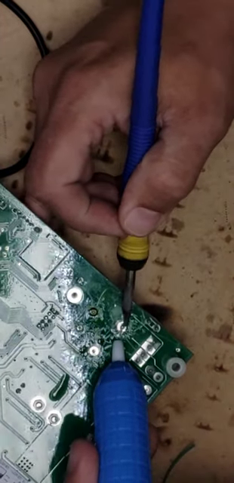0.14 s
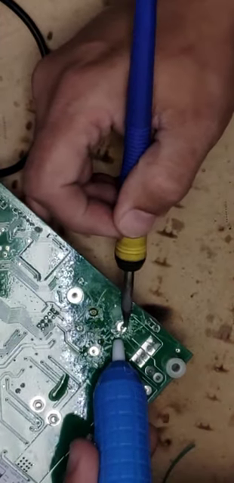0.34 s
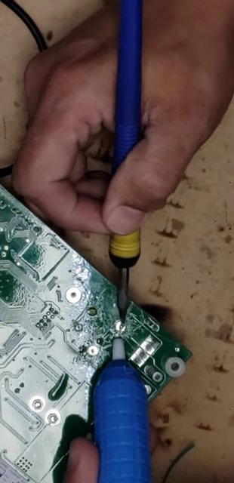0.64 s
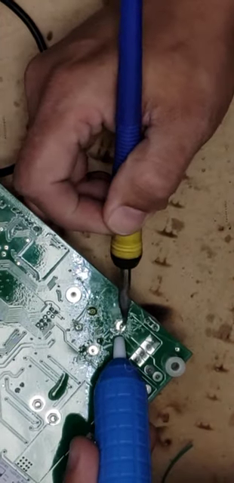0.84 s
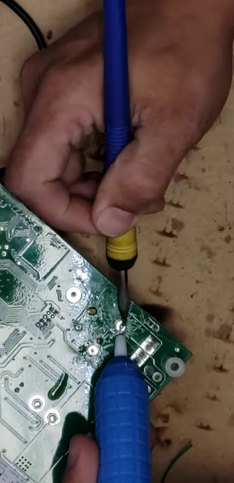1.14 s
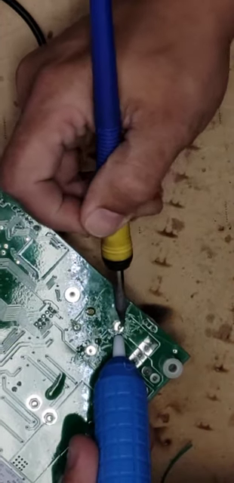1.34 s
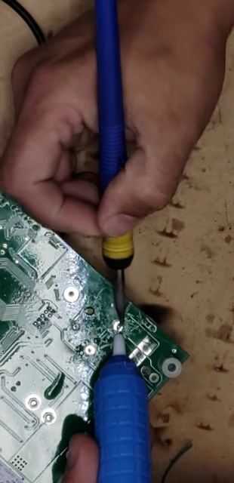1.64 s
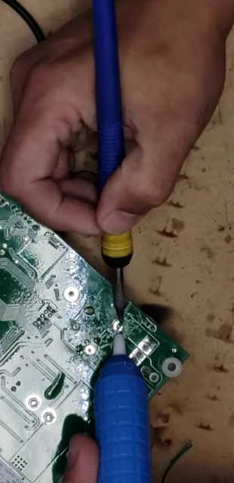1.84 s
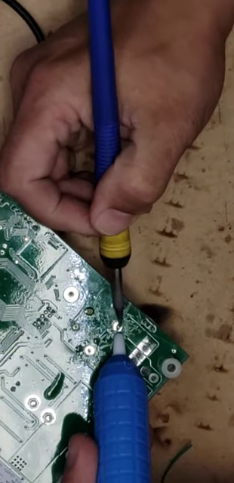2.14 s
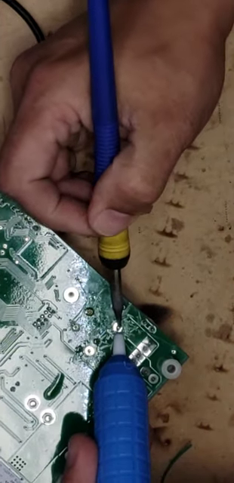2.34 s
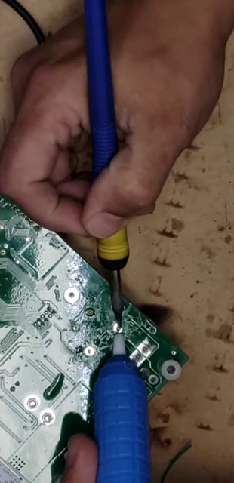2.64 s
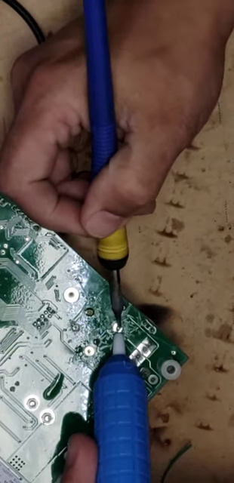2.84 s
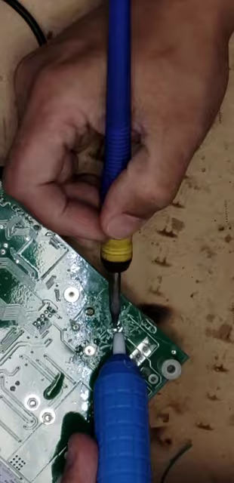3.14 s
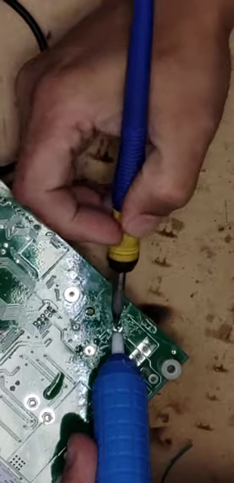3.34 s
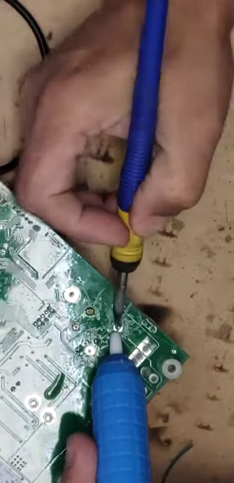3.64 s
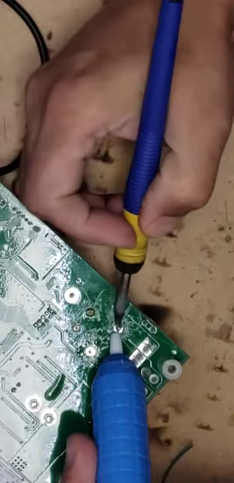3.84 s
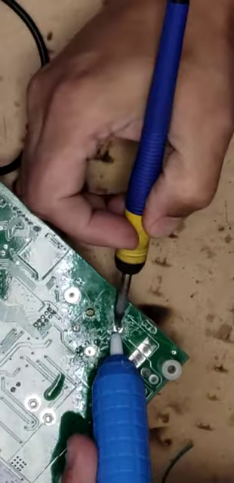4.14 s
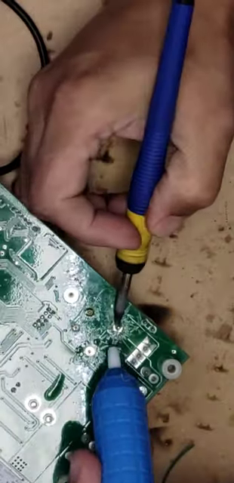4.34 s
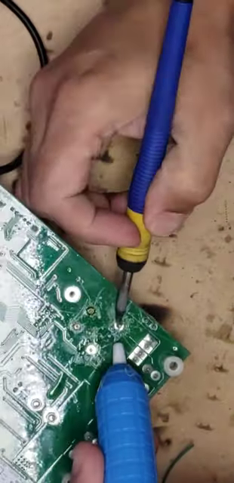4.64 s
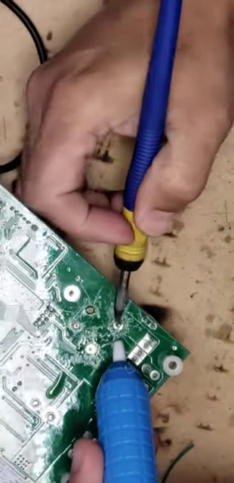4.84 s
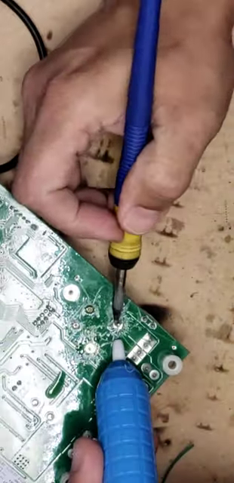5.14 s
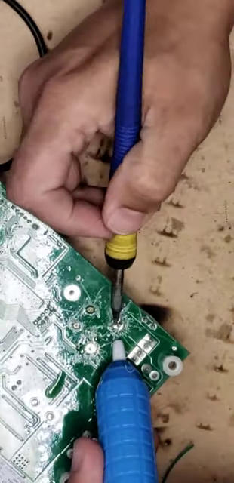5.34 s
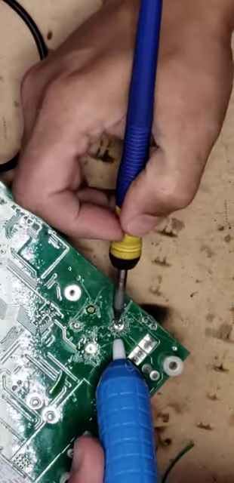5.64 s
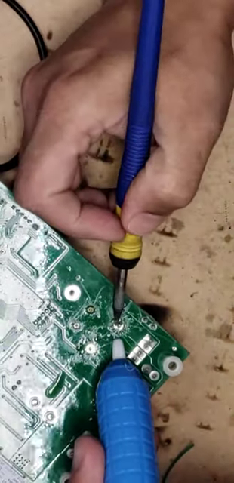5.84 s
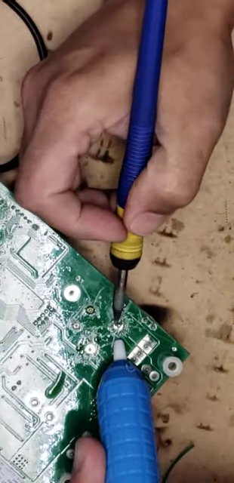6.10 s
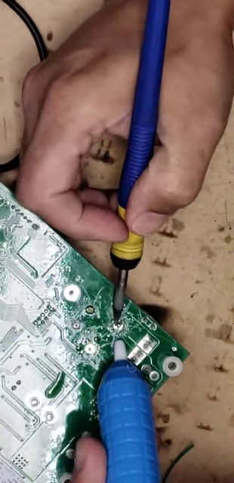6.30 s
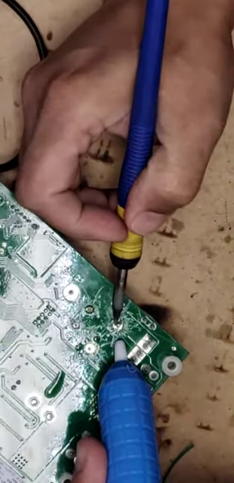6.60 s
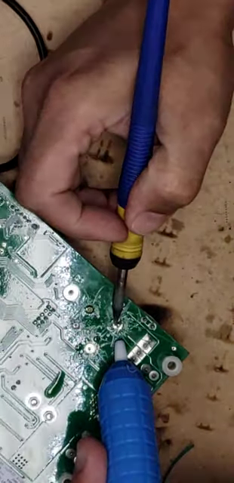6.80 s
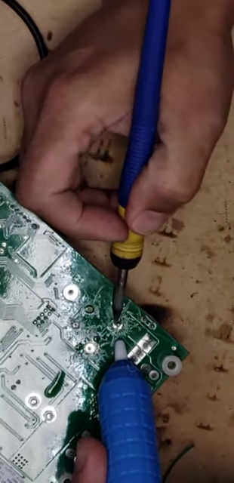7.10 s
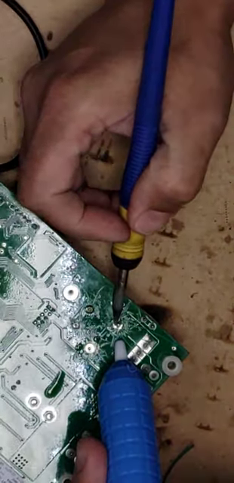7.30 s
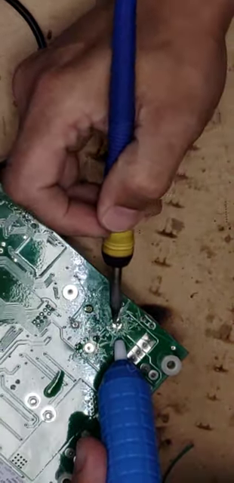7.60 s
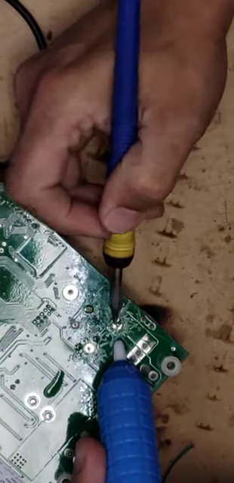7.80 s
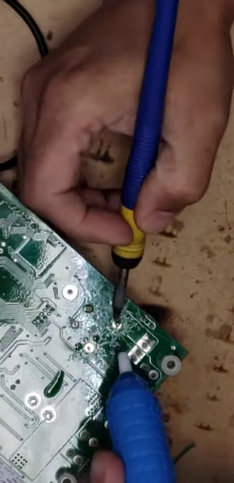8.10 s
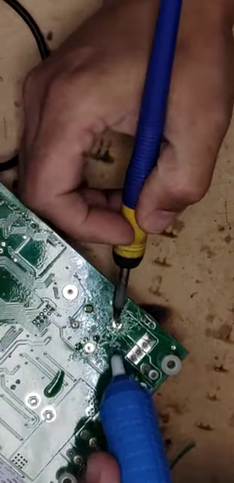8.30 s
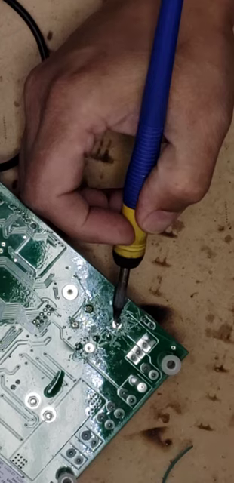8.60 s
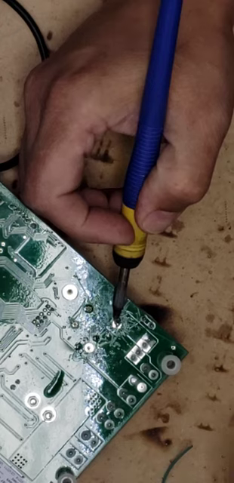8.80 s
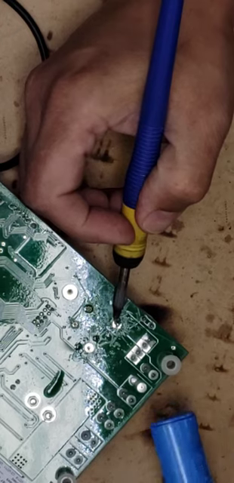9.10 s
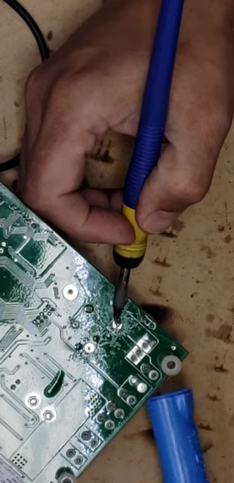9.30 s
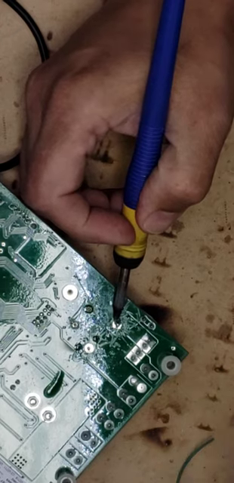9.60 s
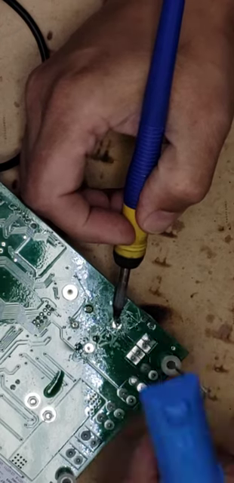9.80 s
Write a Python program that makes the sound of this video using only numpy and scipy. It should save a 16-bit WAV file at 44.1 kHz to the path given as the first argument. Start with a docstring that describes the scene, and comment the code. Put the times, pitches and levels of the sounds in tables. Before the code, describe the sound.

Close up in a workshop, a suction pump gives a low, even electric hum with a buzzy edge and a softer hiss of air. Now and then the desoldering nozzle ticks, squeaks or sizzles faintly. After almost nine seconds the hum and hiss cut off suddenly. The plastic tool knocks and clatters briefly on the bench with a couple of sharp clicks, leaving a faint motor drone and room rumble.

```python
"""Desoldering gun at work

A mains-driven diaphragm pump hums and buzzes in a harmonic series, while turbulent air hisses, slurps
and squeaks through the nozzle. Another motor runs just under mains speed, so the lowest tones beat.
The pump stops dead; the plastic gun is put down on the bench with a knock and a short clatter of
damped modes, and the motor drones on over the rumble of the workshop."""
import sys
import numpy as np
from scipy import signal
from scipy.fft import rfft, irfft, next_fast_len
from scipy.io import wavfile

SR = 44100
rng = np.random.default_rng(int(sys.argv[2]) if len(sys.argv) > 2 else 0)


def transcribe(u):
    """Save the signal u as a 16-bit wav file named by the first command-line argument.

    u: samples, shape (n,) or (channels, n), limited to [-1, 1]; the rate is SR.
    q: integer samples, one column per channel.
    """
    v = np.clip(np.atleast_2d(u).T, -1, 1)
    q = np.round(v * 32767).astype(np.int16)
    wavfile.write(sys.argv[1], SR, q)


N = 438794
T = np.arange(N) / SR
FFT_SIZE = next_fast_len(N)
HZ = np.maximum(np.arange(FFT_SIZE // 2 + 1) * SR / FFT_SIZE, 1)
MAINS_HZ = 60.005
NOZZLE_CLEAR_S, PUMP_STOP_S, AIR_STOP_S = 8.6, 8.751, 8.768

# Pump tones at multiples of the mains frequency: harmonic, relative_db
PUMP_HARMONICS = [(1, -8.5), (2, -11), (3, -9), (4, 0.5), (5, -17.5), (6, -24.5), (7, -30), (8, -28),
                  (9, -26), (10, -34), (11, -31), (12, -31), (13, -22), (14, -28.5), (15, -16.5),
                  (16, -20.5), (17, -24.5), (18, -29.5), (20, -35.5), (21, -32), (22, -43.5), (24, -42.5),
                  (26, -39.5), (27, -35.5), (28, -38), (29, -36), (30, -27), (31, -35.5), (37, -40.5),
                  (41, -43.5), (48, -41)]
# Spectrum of the suction hiss: frequency_hz, relative_db
HISS_SPECTRUM = [(100, 8), (290, 5.5), (330, 6.5), (380, -8.5), (450, 3), (600, -1), (800, 0), (1100, 0.5),
                 (1700, -1.5), (2400, -6.5), (4500, -4), (6600, -9.5), (7500, -18.5), (8100, -34),
                 (16000, -45)]
# Resonances of the air path: centre_hz, width_hz, boost_db
AIR_RESONANCES = [(500, 130, 3.5), (670, 41, 9.5), (2026, 290, 7), (2696, 160, 7), (3135, 98, 5),
                  (3240, 70, 8.5), (3870, 170, 2.5), (4670, 79, 1.5), (5270, 240, 4.5), (6550, 160, 0.5)]
# Spectrum of the thin sizzle of nozzle and sliding plastic: frequency_hz, relative_db
SIZZLE_SPECTRUM = [(5000, -31), (7500, -5.5), (9500, -6.5), (11500, 4), (13500, 1), (15500, 5)]
# Bursts of sizzle as solder is sucked in: start_s, length_s, level_db
SOLDER_SLURPS = [(3.886, .03, -66), (3.92, 0.1, -61), (4.477, .06, -68.5), (5.67, .02, -64),
                 (8.51, .1, -73), (8.608, 0.037, -62.5), (8.674, 0.14, -66)]
# Air whistling past molten solder: start_s, length_s, start_hz, end_hz, level_db
SOLDER_SQUEAKS = [(2.227, 0.052, 1480, 1680, -59), (3.022, 0.076, 671, 670, -55),
                  (3.2, 0.08, 674, 690, -61), (3.89, 0.069, 1560, 1220, -57)]
# Impacts of the gun on the bench: start_s, relative_db, brightness_db, rise_s, t60_s
BENCH_KNOCKS = [(8.954, -51.5, -3.5, 0.004, 0.13), (8.969, -52, -5, .003, 0.16),
                (8.996, -52, -7, 0.0033, 0.094), (9.1805, -66, -9, 0.001, 0.34),
                (9.203, -56.5, -8, 0.0013, 0.27), (9.229, -55, -2.5, 0.002, 0.3),
                (9.27, -52.5, -3, 0.0006, 0.22), (9.316, -52.5, 7, .004, .17),
                (9.3361, -43, 7, 0.0006, 0.024), (9.3504, -43.5, 3.5, .0005, 0.028),
                (9.36, -61, 4, 0.0026, 0.19), (9.516, -58, -9, 0.0044, 0.088),
                (9.541, -59.5, -10, 0.00066, 0.08), (9.917, -69.5, -6, 0.0033, .3)]
# Spectrum of the dense ring of an impact: frequency_hz, relative_db
KNOCK_SPECTRUM = [(150, -1), (500, -16), (850, 3), (1150, 0.5), (1550, 5), (2500, -5.5), (3500, -2.5),
                  (5300, -6), (6800, -5.5), (7800, -14), (9000, -21), (15500, -14)]
# Distinct modes of gun and bench: pitch_hz, relative_db, t60_s
KNOCK_MODES = [(846, -25, 0.039), (1430, -21, 0.073), (1646, -12, .085), (1800, -14, .055),
               (2300, -21, .07), (2513, -14, 0.1), (3270, -9, 0.024), (3750, -28, 0.069),
               (4590, -19, 0.069), (5350, -23, .1), (6310, -21, .08)]
# The gun sliding on the bench: start_s, length_s, level_db
BENCH_SLIDES = [(9.19, 0.097, -63), (9.302, 0.032, -56)]
# Light touches that ring at one pitch: start_s, level_db, pitch_hz, half_width_hz, t60_s
LIGHT_TOUCHES = [(0.49, -50, 1520, 280, .04), (2.533, -46, 1540, 260, .035),
                 (4.637, -46.5, 1600, 280, .035), (8.958, -50, 820, 170, .07),
                 (8.966, -55, 2370, 402, 0.16), (9.383, -59, 1495, 200, .18), (9.43, -76, 2560, 170, 1.0),
                 (9.799, -69.5, 6840, 700, 0.16), (9.889, -78, 5800, 900, 0.16)]
# Tones of the other motor at multiples of its speed: harmonic, rms_db, wander_db
MOTOR_HARMONICS = [(1, -50.5, 1), (2, -56, 1.5), (5, -72.5, 6.5)]
# Spectrum of the room rumble: frequency_hz, relative_db
ROOM_SPECTRUM = [(20, -26), (29, 1.5), (50, 2), (80, 2), (105, -2), (150, -10), (220, -14.5), (310, -11.5),
                 (430, -18.5), (600, -27.5), (800, -39), (7000, -51), (9000, -59.5), (13000, -45.5)]
# Likeness of noise at the two microphones: frequency_hz, correlation
STEREO_COHERENCE = [(40, 0.16), (100, .93), (300, 0.86), (600, 0.5), (1200, 0.4), (2500, 0.27),
                    (8000, -0.02), (15000, .05)]
# Level difference of pump and air between the microphones: frequency_hz, left_minus_right_db
STEREO_LEAN = [(100, -1), (240, -0.5), (400, 0.5), (900, 5.5), (1800, 6), (3200, 9), (5000, 2.5),
               (6000, 11.5), (7300, 17), (9000, 6), (13000, 10.5)]


def pump(cycles, hum_db=-42.5, buzz_db=-0.1, waver_db=0.36, rattle_db=0.18, scatter_rad=0.25):
    """Periodic impacts give a harmonic series: the diaphragm hits both ends of its stroke."""
    out = np.zeros((2, N))
    for harmonic, relative_db in PUMP_HARMONICS:
        hz = harmonic * MAINS_HZ
        buzz_share = np.clip(np.log2(harmonic / 4) / 2, 0, 1)   # 0 for the firm hum, 1 for the buzz
        wander_db = (waver_db + buzz_share * rattle_db) * drift(11)
        gain = from_db(hum_db + relative_db + buzz_share * buzz_db + wander_db)
        # the room scatters the phases of the highest tones
        scatter = scatter_rad * (buzz_share + (hz / 1000) ** 4) * rng.standard_normal()
        phase = 2 * np.pi * harmonic * cycles + stroke_phase(harmonic) + scatter
        pickup = microphones(hz, at_hz(STEREO_LEAN, hz))
        pickup = pickup / abs(pickup).mean()
        out += np.sqrt(2) * gain * (pickup.real * np.cos(phase) - pickup.imag * np.sin(phase))
    return out * decay(PUMP_STOP_S, t60_s=0.03)


def stroke_phase(harmonic, case_hz=205, case_q=4, return_cycles=0.54, return_strength=0.9):
    """Superposition of a blow and a weaker return blow sets the phase; the case resonance delays it."""
    hz = harmonic * MAINS_HZ
    blow_phase = np.angle(1 + return_strength * np.exp(-2j * np.pi * harmonic * return_cycles))
    return blow_phase + np.pi - 2 * np.arctan(case_q * (hz / case_hz - case_hz / hz))


def last_stroke(armature_db=-32, armature_hz=116, case_db=-43, case_hz=58):
    """Damped free vibration: with the current off, the armature swings out and the case rocks to rest."""
    elapsed_s = T - PUMP_STOP_S
    armature = from_db(armature_db) * np.sin(2 * np.pi * armature_hz * elapsed_s)
    case = from_db(case_db) * np.sin(2 * np.pi * case_hz * elapsed_s)
    return (elapsed_s >= 0) * decay(PUMP_STOP_S, t60_s=0.19) * (armature + case)


def suction(cycles, hiss_db=-55.5, sizzle_db=-76.5, pulse_depth=0.048, flicker_db=0.66, wander_db=2.3):
    """Turbulent flow, coloured by nozzle and hose resonances, pulses with the valves; solder sizzles."""
    peaks_db = sum(resonance_db(*peak) for peak in AIR_RESONANCES)
    lean_db = at_hz(STEREO_LEAN, HZ)
    ripple_db = reflections(depth_db=2.33, spacing_hz=25.21)
    hiss = noise(at_hz(HISS_SPECTRUM, HZ) + peaks_db + ripple_db, lean_db)
    valves = 1 + pulse_depth * (np.cos(2 * np.pi * cycles) + np.cos(4 * np.pi * cycles)) / 2
    opening_db = 2.5 * (T > NOZZLE_CLEAR_S)   # clear of the board, the nozzle draws more air
    hiss = hiss * valves * from_db(hiss_db + opening_db + flicker_db * drift(9.4))
    sizzle = noise(at_hz(SIZZLE_SPECTRUM, HZ), lean_db)
    steady_power = from_db(sizzle_db + wander_db * drift(1.2)) ** 2
    slurp_power = sum((from_db(level_db) * envelope(start_s, length_s, rise_s=0.008, t60_s=0.25)) ** 2
                      for start_s, length_s, level_db in SOLDER_SLURPS)
    return (hiss + sizzle * np.sqrt(steady_power + slurp_power)) * decay(AIR_STOP_S, t60_s=0.15)


def squeaks(wobble_depth=0.039):
    """Flow through a narrow gap whistles; the unsteady pitch glides as the gap at the nozzle changes."""
    out = np.zeros(N)
    wobble = 1 + wobble_depth * drift(71)
    for start_s, length_s, start_hz, end_hz, level_db in SOLDER_SQUEAKS:
        progress = np.clip((T - start_s) / length_s, 0, 1)
        hz = (start_hz + (end_hz - start_hz) * progress) * wobble
        out += from_db(level_db) * np.sin(np.pi * progress) * np.sin(2 * np.pi * np.cumsum(hz) / SR)
    return pan(lean_db=6) * out


def scrape(start_s=6.29, length_s=0.077, level_db=-60, centre_hz=3800, half_width_hz=2200, grain_db=2):
    """Friction of the metal nozzle on the solder joint gives a soft band of grainy noise."""
    rub = noise(band_db(centre_hz, half_width_hz, order=4), lean_db=6)
    shape = envelope(start_s, length_s, rise_s=0.037, t60_s=0.13)
    return rub * shape * from_db(level_db + grain_db * drift(90))


def knocks(room_db=-23, room_t60_s=0.32, split_hz=3000, body_db=-1, modes_db=2, lean_db=5):
    """Impacts excite the modes of gun and bench: a dense ring, a few clear pitches, a short room tail."""
    body = noise(at_hz(KNOCK_SPECTRUM, HZ) + reflections(depth_db=3.5, spacing_hz=70.2), lean_db)
    dull = irfft(rfft(body, FFT_SIZE) / (1 + (HZ / split_hz) ** 4), FFT_SIZE)[:, :N]
    bright = body - dull
    dull_power, bright_power = np.zeros((2, N))
    for start_s, knock_db, brightness_db, rise_s, t60_s in BENCH_KNOCKS:
        attack = 1 - np.exp(-np.maximum(T - start_s, 0) / rise_s)
        shape = attack * (decay(start_s, t60_s) + from_db(room_db) * decay(start_s, room_t60_s))
        dull_power += (from_db(knock_db) * shape) ** 2
        bright_power += (from_db(knock_db + brightness_db) * shape) ** 2
    out = from_db(body_db) * (dull * np.sqrt(dull_power) + bright * np.sqrt(bright_power))
    starts_s, knocks_db, brights_db, rises_s, _ = np.transpose(BENCH_KNOCKS)
    for hz, mode_db, t60_s in KNOCK_MODES:
        # each mode is struck at a random moment while the contact builds up
        onsets = ((starts_s + 2 * rises_s * rng.random(len(starts_s))) * SR).astype(int)
        strikes_db = knocks_db + mode_db + modes_db + brights_db * (hz > split_hz)
        impulses = np.zeros(N)
        impulses[onsets] = from_db(strikes_db + rng.normal(0, 1.6, len(onsets)))
        out += pan(lean_db) * damped_mode(impulses, hz, t60_s)
    return out


def slide(grain_db=2):
    """Sliding friction of plastic on the bench gives a thin, grainy hiss."""
    shape = sum(from_db(level_db) * envelope(start_s, length_s, rise_s=0.02, t60_s=0.1)
                for start_s, length_s, level_db in BENCH_SLIDES)
    return shape * from_db(grain_db * drift(90)) * noise(at_hz(SIZZLE_SPECTRUM, HZ), lean_db=5)


def ticks():
    """Light impacts between small parts each excite a narrow cluster of modes."""
    out = np.zeros((2, N))
    for start_s, level_db, pitch_hz, half_width_hz, t60_s in LIGHT_TOUCHES:
        ring = noise(band_db(pitch_hz, half_width_hz, order=2), lean_db=4)
        shape = envelope(start_s, length_s=0, rise_s=0.00044, t60_s=t60_s)
        # the blow sets the energy, however it is shared among the modes
        out += from_db(level_db) * unit_rms(shape * ring) * np.sqrt(np.mean(shape ** 2))
    return out


def motor(slip_hz=0.1632, in_step_s=3.035, jitter_rad=0.07):
    """Beating: the other motor lags the mains by its slip, drifting in and out of step with the pump."""
    cycles = MAINS_HZ * T - slip_hz * (T - in_step_s)
    out = np.zeros(N)
    for harmonic, rms_db, wander_db in MOTOR_HARMONICS:
        phase = harmonic * (2 * np.pi * cycles + jitter_rad * drift(2.3)) + stroke_phase(harmonic)
        out += np.sqrt(2) * from_db(rms_db + wander_db * drift(2.2)) * np.cos(phase)
    return out


def workshop(level_db=-52):
    """One narrow room resonance colours a low background rumble."""
    spectrum_db = at_hz(ROOM_SPECTRUM, HZ) + resonance_db(centre_hz=305, width_hz=24, boost_db=5)
    return from_db(level_db) * noise(spectrum_db, lean_db=0)


def reflections(depth_db, spacing_hz):
    """Interference from nearby surfaces ripples the spectrum (dB), differently at each microphone."""
    knots_hz = np.arange(4000) * spacing_hz
    ripples = rng.standard_normal((2, len(knots_hz)))
    return depth_db * np.array([np.interp(HZ, knots_hz, ripple) for ripple in ripples])


def noise(spectrum_db, lean_db):
    """Partly coherent stereo noise of a given spectral shape, most alike in the upper bass."""
    mid, side = rfft(rng.standard_normal((2, FFT_SIZE)))
    coherence = at_hz(STEREO_COHERENCE, HZ)
    white = np.sqrt(1 + coherence) * mid + np.sqrt(1 - coherence) * side * [[1], [-1]]
    coloured = white * from_db(spectrum_db) * microphones(HZ, lean_db)
    return unit_rms(irfft(coloured, FFT_SIZE)[:, :N])


def microphones(hz, lean_db, left_lag_s=0.00016):
    """Differences of level and arrival time give each microphone a complex gain."""
    return pan(lean_db) * np.exp(1j * np.pi * hz * left_lag_s * np.array([[-1], [1]]))


def pan(lean_db):
    """A level difference, left minus right, split evenly into two gains."""
    return from_db(np.array([[0.5], [-0.5]]) * lean_db)


def damped_mode(force, hz, t60_s):
    """A damped oscillator answers each impulse with a decaying sine."""
    radius, angle = np.exp(-np.log(1000) / (t60_s * SR)), 2 * np.pi * hz / SR
    return signal.lfilter([0, np.sin(angle)], [1, -2 * radius * np.cos(angle), radius ** 2], force + 1e-18)


def resonance_db(centre_hz, width_hz, boost_db):
    """A resonance lifts the spectrum in a bell-shaped peak."""
    return boost_db / (1 + (2 * (HZ - centre_hz) / width_hz) ** 2)


def band_db(centre_hz, half_width_hz, order):
    """Band-pass response, 6 dB down at one half width from the centre."""
    return -20 * np.log10(1 + ((HZ - centre_hz) / half_width_hz) ** order)


def envelope(start_s, length_s, rise_s, t60_s):
    """Exponential rise towards a steady level, then free decay."""
    return (1 - np.exp(-np.clip((T - start_s) / rise_s, 0, 40))) * decay(start_s + length_s, t60_s)


def decay(start_s, t60_s):
    """Exponential damping: 1 until the start, then 60 dB down in each t60_s."""
    return np.exp(-np.minimum(np.log(1000) * np.maximum(T - start_s, 0) / t60_s, 40))


def drift(rate_hz):
    """Low-passed noise gives a random fluctuation of unit rms."""
    hop, settling_steps = 100, 1000
    pole = np.exp(-2 * np.pi * rate_hz * hop / SR)
    white = rng.standard_normal(N // hop + settling_steps + 2)
    slow = signal.lfilter([1], [1, -2 * pole, pole ** 2], white)[settling_steps:]
    return np.interp(np.arange(N) / hop, np.arange(len(slow)), unit_rms(slow))


def at_hz(curve, hz):
    """Interpolation on a logarithmic frequency axis."""
    knots_hz, values = np.transpose(curve)
    return np.interp(np.log(hz), np.log(knots_hz), values)


def unit_rms(x):
    """Normalisation: the mean of the channels gets an rms of 1."""
    return x / np.sqrt(np.mean(np.atleast_2d(x).mean(axis=0) ** 2) + 1e-20)


def from_db(db):
    """Decibels to amplitude ratio."""
    return 10 ** (np.asarray(db) / 20)


def scene():
    """Superposition of gun, handling and background; pump and air share one stroke cycle."""
    cycles = MAINS_HZ * T + 0.0042 * drift(0.5)
    gun = pump(cycles) + last_stroke() + suction(cycles) + squeaks()
    handling = scrape() + knocks() + slide() + ticks()
    return gun + handling + motor() + workshop()


def record(dry, cutoff_hz=15750):
    """Band limiting: a steep elliptic low-pass removes the highest treble."""
    return signal.sosfilt(signal.ellip(12, 0.1, 90, cutoff_hz, fs=SR, output="sos"), dry)


dry = scene()
out = record(dry)
transcribe(out)
```